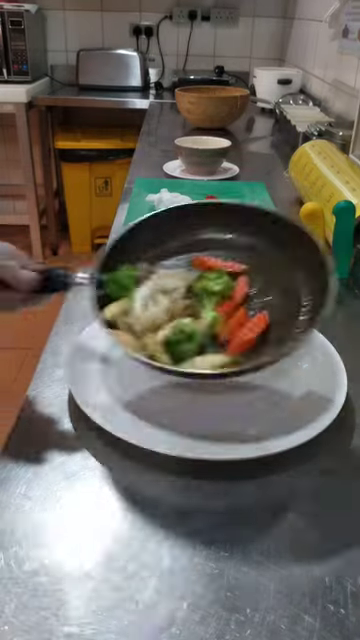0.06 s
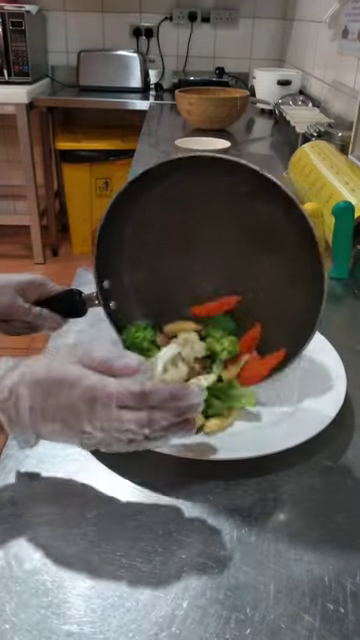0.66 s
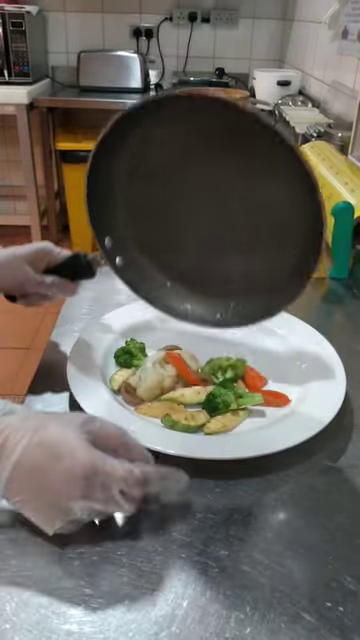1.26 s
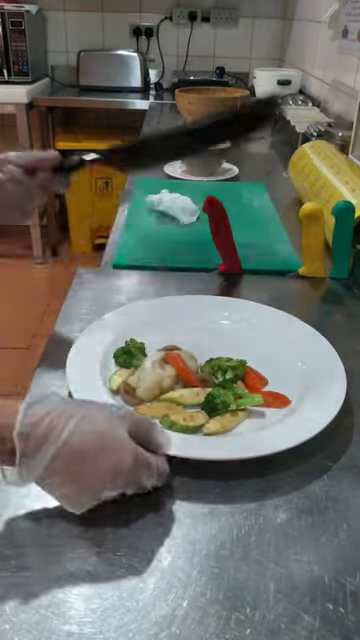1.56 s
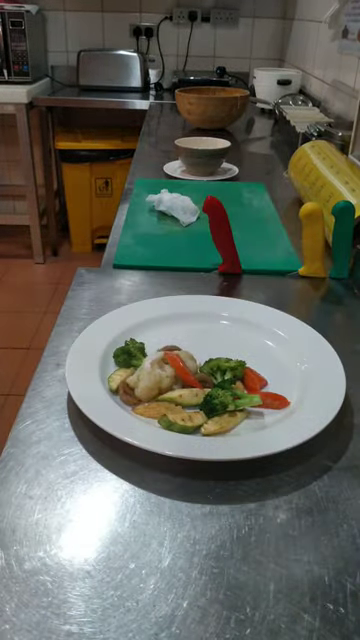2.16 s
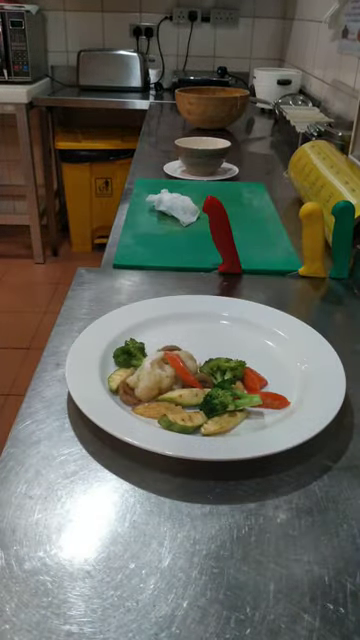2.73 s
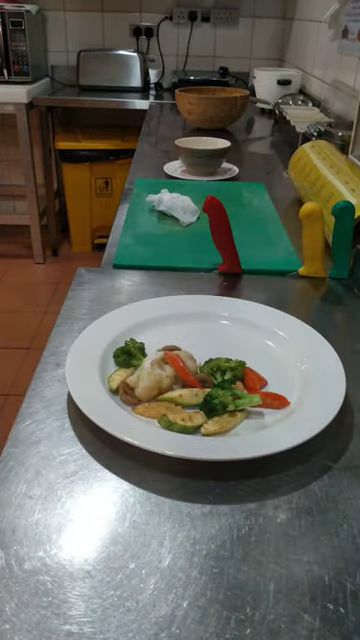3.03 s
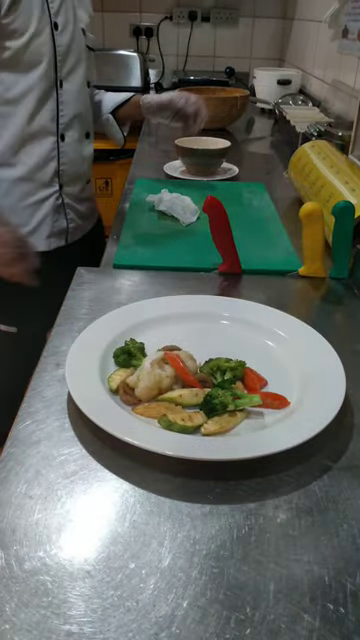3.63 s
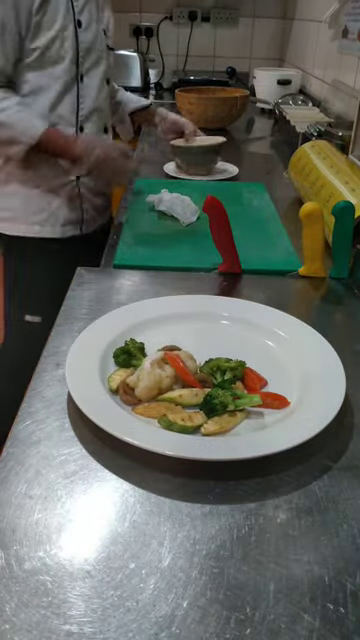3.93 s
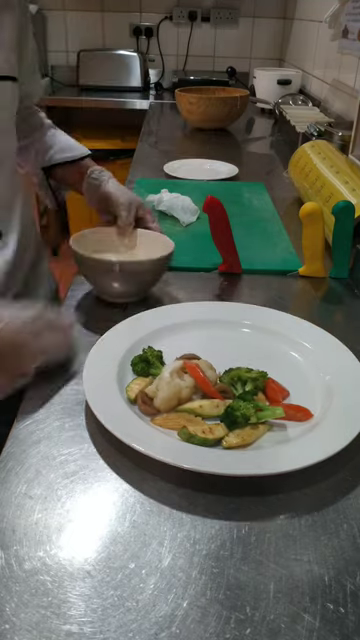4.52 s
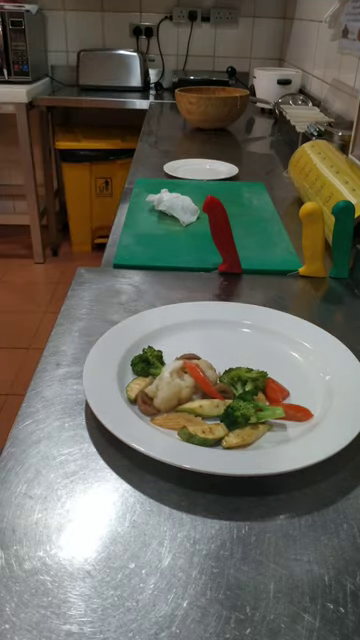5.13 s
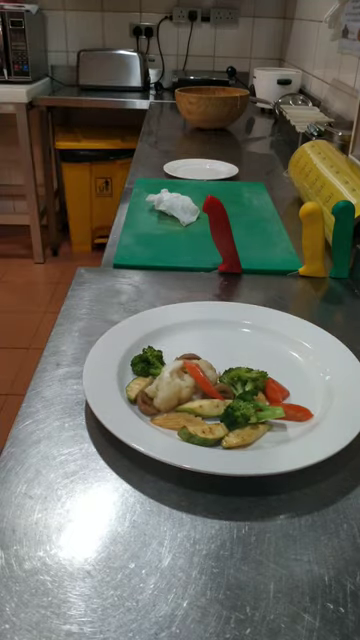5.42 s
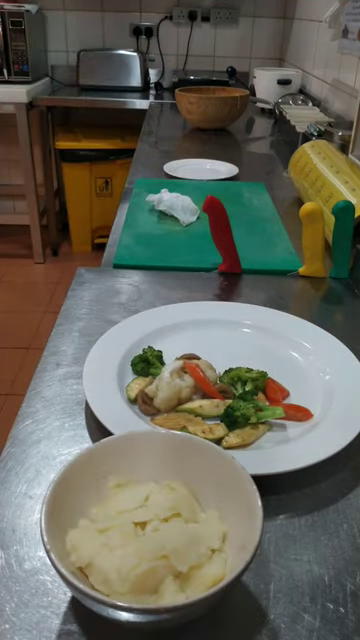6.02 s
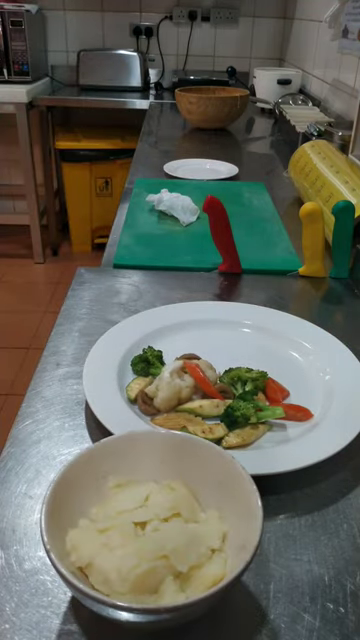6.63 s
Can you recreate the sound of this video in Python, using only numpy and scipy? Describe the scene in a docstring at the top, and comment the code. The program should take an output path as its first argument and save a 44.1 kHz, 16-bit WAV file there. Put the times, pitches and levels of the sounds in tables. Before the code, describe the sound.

Vegetables sizzle brightly in hot oil, then die down to a faint hiss after about a second. China clinks once, and a pan clatters down across the tiled kitchen with a brief ring. Utensils tick, a china bowl rattles off its saucer, and it is set on a steel counter close by with knocks and a low boom. An extractor hood rumbles throughout.

```python
"""An extractor hood rumbles throughout. Vegetables sizzle as their water bursts in hot oil, until they are
tipped onto a plate near 1 s and the pan is carried off. China clinks once, utensils tick, and at 2.5 s the pan
clatters down across the tiled kitchen, ringing in its modes. At 3.8 s a china bowl clinks off its saucer and
scrapes briefly; from 4.6 s it is set on the steel counter, which booms. A microphone resonance near 7.4 kHz
brightens the sizzle, ticks and taps."""
import sys
import numpy as np
from scipy import signal
from scipy.fft import rfft, irfft
from scipy.io import wavfile
from scipy.ndimage import uniform_filter1d

SR = 44100
rng = np.random.default_rng(int(sys.argv[2]) if len(sys.argv) > 2 else 0)


def inscribe(sig):
    """Save sig as 16-bit PCM at rate SR to the path in sys.argv[1].

    A 1-D sig is mono; a 2-D sig holds one channel per row.
    Samples are clipped to [-1, 1] before scaling.
    """
    pcm = np.round(np.clip(np.atleast_2d(sig).T, -1, 1) * 32767)
    wavfile.write(sys.argv[1], SR, pcm.astype(np.int16))


N = 298998
TIME = np.arange(N) / SR
AFTER = TIME[:SR]  # one second of ringing

# spectra of a tick and a tap, with the microphone's bright peak near 7.4 kHz: frequency_hz, level_db
TICK_SPECTRUM = [(900, -41.5), (2000, -29.5), (2900, -35), (3700, -24.5), (4900, -21.5), (5600, -14.5),
                 (6300, -5.5), (6900, 6), (7350, 6), (7900, -16), (8500, -32)]
TAP_SPECTRUM = [(900, -27), (1500, -22), (2200, -18.5), (2900, -28), (3700, -13), (4400, -18), (5700, -7.5),
                (6900, -0.5), (7450, 7.5), (7900, -5), (8500, -21.5)]


def undb(db):
    """Decibels to amplitude ratio."""
    return 10 ** (np.asarray(db) / 20)


def unit(x):
    """Normalisation to rms 1."""
    return x / np.sqrt(np.mean(x ** 2))


def crest(x):
    """Normalisation of the loudest 10 ms to rms 1."""
    return x / np.sqrt(uniform_filter1d(x ** 2, SR // 100).max())


def through(x, response):
    """Convolution with an impulse response."""
    return signal.fftconvolve(x, response)[:len(x)]


def colour(x, spectrum, size=4096):
    """Minimum-phase filtering: folding the cepstrum makes the response causal."""
    hz, db = np.transpose(spectrum)
    bins_hz = np.maximum(np.arange(size // 2 + 1) * SR / size, 1)
    gain = undb(np.interp(np.log(bins_hz), np.log(hz), db))
    cepstrum = irfft(np.log(gain))
    cepstrum[1:size // 2] *= 2
    cepstrum[size // 2 + 1:] = 0
    return through(x, irfft(np.exp(rfft(cepstrum))))


def walk(rate_hz):
    """Random modulation: chance values joined by ramps, rms 1."""
    hold = int(SR / rate_hz)
    steps = np.repeat(rng.standard_normal(N // hold + 1), hold)
    return unit(uniform_filter1d(steps, hold)[:N])


def fade(t60):
    """Exponential damping, 60 dB in t60 seconds."""
    return undb(-60 * AFTER / t60)


def dying(db, from_s, db_per_s):
    """A steady gain, then exponential decay."""
    return undb(db - db_per_s * np.maximum(TIME - from_s, 0))


def add(track, start_s, sound):
    """Superposition of a sound on a track."""
    start = int(start_s * SR)
    track[start:start + len(sound)] += sound[:N - start]


def room(wet_db, t60=0.31, gap_s=0.0025):
    """Reverberation: direct sound, then dense reflections from tiles and steel."""
    tail = rng.standard_normal(SR) * fade(t60) * (AFTER > gap_s)
    response = undb(wet_db) * tail / np.linalg.norm(tail)
    response[0] = 1
    return response


def contact(rise_s, t60, wet_db, grain_db=4):
    """Excitation: a burst of tiny collisions builds and dies, heard in the room."""
    grains = rng.standard_normal(SR) * undb(grain_db * np.repeat(rng.standard_normal(SR), 32)[:SR])
    attack = np.minimum(AFTER / rise_s, 1)
    decay = np.minimum(fade(t60) / undb(-60 * rise_s / t60), 1)
    return through(grains * attack * decay, room(wet_db))


def ring(push, hz, t60, swell_s=0.0012):
    """Driven resonance: one damped mode swells as waves cross the object."""
    swell = 1 - np.exp(-(AFTER / swell_s) ** 2)
    return crest(through(push, np.sin(2 * np.pi * hz * AFTER) * fade(t60) * swell))


def crack(push, treble, tick_db, clack_db):
    """Broadband impact noise: a bright tick and a hollow clack."""
    # spectrum of the clack: frequency_hz, level_db
    hollow = [(40, -48.5), (200, -20), (400, -12.5), (580, 1), (880, 2.5), (1300, -3), (1900, -11),
              (2400, -16.5), (2900, -23.5), (3700, -18.5), (5000, -18), (8000, -19.5)]
    return undb(tick_db) * crest(colour(push, treble)) + undb(clack_db) * crest(colour(push, hollow))


def extractor_hood(rush_db=-43.5, duct_hz=121.8, width_hz=29.7):
    """Turbulence: air rushes through the hood and excites a duct resonance."""
    # spectrum of the airflow: frequency_hz, level_db
    airflow = [(15, -29), (28, -12), (80, -5.5), (160, -8.5), (240, -5), (320, -6), (400, -12.5),
               (530, -11.5), (660, -17.5), (820, -12.5), (1050, -21), (1350, -28), (2100, -36),
               (3100, -48.5)]
    # course of the duct's rumble: time_s, level_db
    duct_levels = [(0, -46), (1.1, -50.5), (2.4, -44.5), (4.1, -50), (5.3, -43), (6.78, -46.5)]
    rush = unit(colour(rng.standard_normal(N), airflow)) * undb(rush_db + 0.5 * walk(5.9))
    bins_hz = np.arange(N // 2 + 1) * SR / N
    resonance = 1 / (1 + (2 * (bins_hz - duct_hz) / width_hz) ** 2)
    rumble = unit(irfft(rfft(rng.standard_normal(N)) * resonance, N))
    return rush + rumble * undb(np.interp(TIME, *np.transpose(duct_levels)))


def hiss(level_db=-50.5):
    """Band-limited noise: a thin hiss that flickers slightly."""
    # spectrum of the hiss: frequency_hz, level_db
    band = [(2000, -39), (3100, -32), (3700, -21.5), (5000, -18.5), (5700, -14.5), (6500, -6), (7050, -3.5),
            (7500, 3.5), (7800, -6), (8050, -17.5), (8500, -36)]
    return unit(colour(rng.standard_normal(N), band)) * undb(level_db + 1.2 * walk(17))


def hum(pitch_hz=344):
    """Frequency and amplitude modulation: a wavering tone, dying away as the pan lands."""
    phase = 2 * np.pi * np.cumsum(pitch_hz + 4 * walk(13)) / SR
    return unit(np.sin(phase)) * dying(db=-50, from_s=2.48, db_per_s=47.5) * undb(2 * walk(8))


def knocks(blows, treble, rise_s, wet_db):
    """Heavy damping: contacts with no ring."""
    out = np.zeros(N)
    for start_s, tick_db, clack_db, t60 in blows:
        add(out, start_s, crack(contact(rise_s, t60, wet_db), treble, tick_db, clack_db))
    return out


def utensils():
    """Brief contacts excite high frequencies: sharp ticks across the room."""
    # utensil contacts: start_s, tick_db, clack_db, t60_s
    ticks = [(2.399, -26, -52.5, 0.11), (3.095, -35.5, -46, 0.026), (3.387, -27, -46.5, 0.027),
             (3.479, -28.5, -52, 0.17), (3.641, -39.5, -63, .054), (3.657, -30, -60, .11)]
    return knocks(ticks, TICK_SPECTRUM, rise_s=0.0044, wet_db=4)


def scuffs():
    """Sliding friction close by: slow to build, slow to die."""
    # handling scuffs: start_s, tick_db, clack_db
    slides = [(5.08, -43.5, -49), (5.5, -61, -50), (6.705, -38, -40.5)]
    out = np.zeros(N)
    for start_s, tick_db, clack_db in slides:
        push = contact(rise_s=0.019, t60=0.39, wet_db=-12)
        add(out, start_s, crack(push, TAP_SPECTRUM, tick_db, clack_db))
    return out


def counter_taps():
    """Damped impacts: dry knocks on the counter."""
    # knocks: start_s, tick_db, clack_db, t60_s
    taps = [(4.551, -34.5, -42.5, 0.027), (4.648, -36, -45.5, .055), (4.67, -41, -44, 0.048),
            (5.647, -35.5, -45, 0.065), (5.749, -28.5, -35.5, .028), (5.819, -53, -48, 0.056),
            (5.995, -48, -50.5, 0.11)]
    return knocks(taps, TAP_SPECTRUM, rise_s=0.002, wet_db=-2)


def counter_boom():
    """Plate vibration: the steel top thuds under the bowl and booms on in its low modes."""
    # modes of the steel top: pitch_hz, level_db, t60_s
    modes = [(160.5, -3, 0.27), (208, -7.5, 0.25), (240.6, 3.5, 0.18), (275, -4, 0.17),
             (350.5, -10.5, 0.21), (770, -14, .1)]
    # spectrum of the thud: frequency_hz, level_db
    thud = [(50, -47), (110, -3), (170, 6), (250, 2.5), (350, -4.5), (550, -7.5), (800, -7.5), (1300, -32),
            (3000, -37.5)]
    # landings of the bowl: start_s, thud_db, t60_s, ring_db
    landings = [(4.663, -38.5, 0.18, -48), (5.749, -21.5, 0.029, -35.5), (5.762, -33.5, 0.1, -34),
                (5.817, -31.5, 0.07, -38.5)]
    out = np.zeros(N)
    for start_s, thud_db, t60, ring_db in landings:
        push = contact(rise_s=0.0011, t60=t60, wet_db=-22.5)
        boom = sum(undb(db) * ring(push, hz, mode_t60) for hz, db, mode_t60 in modes)
        add(out, start_s, undb(thud_db) * crest(colour(push, thud)) + undb(ring_db) * boom)
    return out


def struck(modes, blows, rise_s, chatter_t60, tick_offset_db, wet_db):
    """Modal superposition: each blow rings all modes, with its own loudness and brightness."""
    out = np.zeros(N)
    for start_s, ring_db, tilt_db, clack_db in blows:
        push = contact(rise_s, chatter_t60, wet_db)
        tones = sum(ring(push, hz, t60) * undb(db + tilt_db * np.log2(hz / 7000))
                    for hz, db, t60 in modes)
        impact = crack(push, TICK_SPECTRUM, ring_db + tick_offset_db, clack_db)
        add(out, start_s, undb(ring_db) * tones + impact)
    return out


def pan():
    """Inharmonic modes ring at each rebound as the pan lands and rattles."""
    # modes of the pan: pitch_hz, level_db, t60_s
    modes = [(587, -21, 0.048), (684, -24, 0.047), (752, -19, 0.17), (799.6, -2.5, 0.13), (919, -15, 0.14),
             (1044, -14, 0.11), (1193, -19, 0.2), (1350, -34, 0.16), (1653, -10, 0.15), (2066, -22, 0.07),
             (2425, -13, 0.045), (3120, -27.5, .1), (3444, -20, 0.093), (3960, -27.5, 0.15),
             (4540, -24.5, 0.15), (4660, -33, 0.07), (5340, -18.5, 0.12), (5680, -9, 0.058),
             (6820, -11, 0.11), (6600, -20, .1), (6940, -12, 0.072), (7530, -2, 0.064), (7500, -20, .08),
             (7360, -19, 0.12), (8330, -29, .08)]
    # landing and rebounds: start_s, ring_db, tilt_db_per_octave, clack_db
    blows = [(2.468, -29, 2.5, -42), (2.477, -20.5, 6.5, -36), (2.495, -26, 3.5, -28.5),
             (2.538, -26.5, 2, -35.5), (2.561, -39, 7, -37.5), (2.583, -39.5, -2, -52),
             (2.664, -53.5, 1, -60)]
    return struck(modes, blows, rise_s=0.0067, chatter_t60=0.024, tick_offset_db=-3, wet_db=2)


def saucer():
    """Free vibration: the saucer rings after the bowl tips against it."""
    # modes of the saucer: pitch_hz, level_db, t60_s
    modes = [(1207, -29.5, .1), (2128, -9.5, 0.12), (3430, -23.5, 0.09), (3620, -14, 0.11),
             (5070, -17, 0.069), (5498, -13.5, 0.093), (5700, -23.5, .06), (6790, 1, 0.11),
             (6901, -25, .06), (7830, -19, .06)]
    # blows of the bowl: start_s, ring_db, tilt_db_per_octave, clack_db
    blows = [(3.765, -30, -1, -48), (3.775, -26.5, 2.5, -41)]
    return struck(modes, blows, rise_s=0.0056, chatter_t60=0.021, tick_offset_db=-3, wet_db=-1.5)


def china():
    """Stiff, light shells have high modes: china clinks."""
    # modes of the china: pitch_hz, level_db, t60_s
    modes = [(2104, -26, 0.19), (2980, -30, 0.084), (3530, -23.5, 0.064), (4310, -29.5, 0.051),
             (4380, -23, 0.083), (5135, -27.5, .08), (5493, -29, .08), (5930, -12.5, 0.093),
             (6142, -31, 0.069), (6900, -24, .06), (7420, -21, .06), (7370, -10.5, .08), (7610, 0.5, 0.077),
             (8346, -26.5, .08)]
    # a clink at 1.7 s, then a scrape of rapid contacts from 3.83 s: start_s, ring_db, tilt_db_per_octave,
    # clack_db
    blows = [(1.722, -38.5, -1.5, -42), (3.827, -26, 1.5, -41.5), (3.841, -25.5, 9, -47),
             (3.865, -30, 0, -42.5), (3.896, -26, 4.5, -44.5), (3.932, -36, -3, -45),
             (3.965, -43, -5.5, -39)]
    return struck(modes, blows, rise_s=0.0048, chatter_t60=0.045, tick_offset_db=-8.5, wet_db=0.1)


def sizzle_gain(tipped_s=0.94):
    """Incoherent sources add in power: frying food, slowly cooling residue and brief swells."""
    # swells of the sizzle: centre_s, peak_db, half_width_s
    swells = [(.075, -29.5, 0.03), (.33, -32.5, 0.18), (.76, -33, 0.093), (2.86, -44, 0.087),
              (4.5, -47, 0.062), (5.05, -49, 0.13), (6.34, -44.5, 0.1)]
    food = dying(db=-33.5, from_s=tipped_s, db_per_s=31)
    residue = dying(db=-44.5, from_s=tipped_s, db_per_s=1.5)
    power = food ** 2 + residue ** 2
    for centre_s, peak_db, half_width_s in swells:
        power += undb(peak_db) ** 2 * np.exp(-((TIME - centre_s) / half_width_s) ** 2)
    return np.sqrt(power)


def sizzle(pops_per_s=2600, spread_db=1.5, steam_db=-6):
    """Flash boiling: water bursts in hot oil, many tiny pops and a few larger, over a hiss of steam."""
    # spectrum of the sizzle, with the microphone's bright peak near 7.4 kHz: frequency_hz, level_db
    spectrum = [(1000, -40), (3000, -37.5), (4000, -26.5), (4970, -24.5), (5500, -13.5), (6400, -9),
                (7000, -2), (7450, 1.5), (7800, -5.5), (8050, -15), (8500, -30.5)]
    sizes = undb(spread_db * np.minimum(rng.exponential(size=N), 5))
    pops = (rng.random(N) < pops_per_s / SR) * sizes * rng.choice([-1, 1], N)
    steam = undb(steam_db) * rng.standard_normal(N)
    frying = through(unit(pops) + steam, room(wet_db=-4))
    return unit(colour(frying, spectrum)) * sizzle_gain() * undb(1.5 * walk(60))


def scene():
    """Superposition in one channel; the farther a source, the more reverberant it is."""
    clatter = pan() + saucer() + china() + utensils()
    counter = counter_taps() + scuffs() + counter_boom()
    return (clatter + counter + sizzle() + extractor_hood() + hiss() + hum())[None]


def record(dry, cutoff_hz=8500):
    """Band limiting: an elliptic low-pass cuts the top steeply."""
    return signal.sosfilt(signal.ellip(12, 0.2, 70, cutoff_hz, fs=SR, output="sos"), dry)


dry = scene()
out = record(dry)
inscribe(out)
```